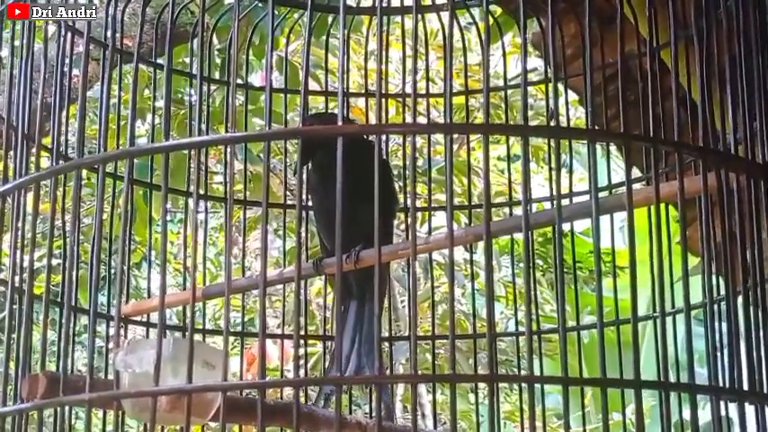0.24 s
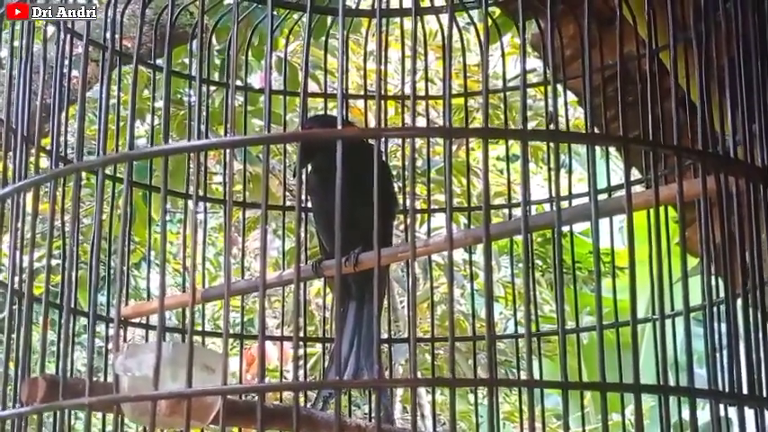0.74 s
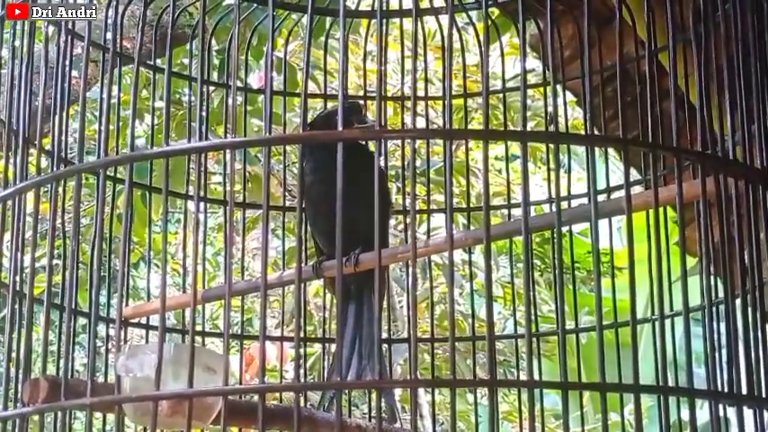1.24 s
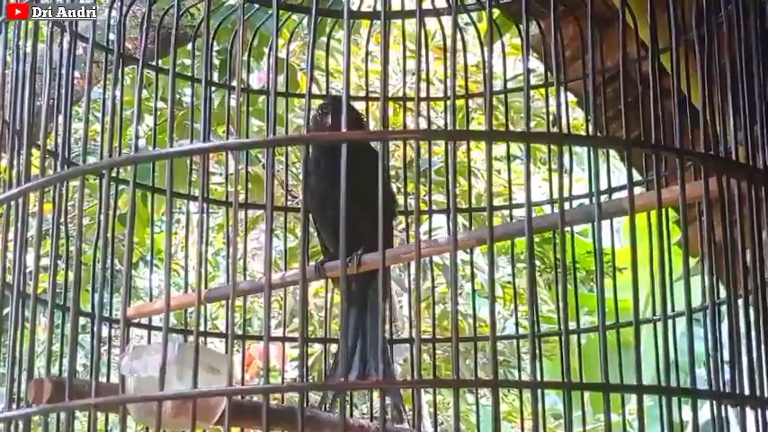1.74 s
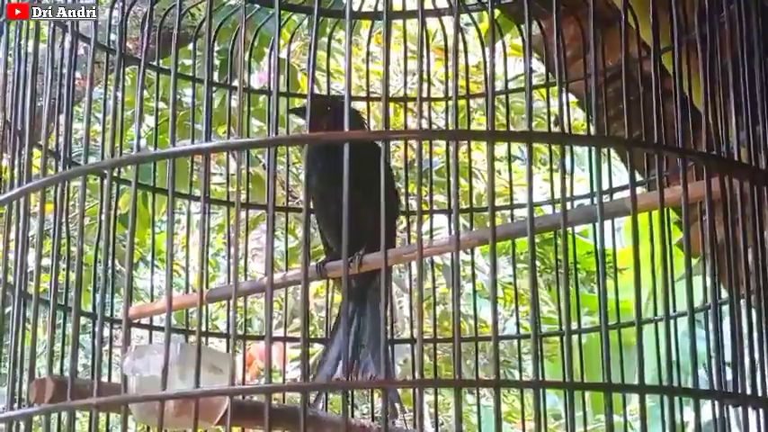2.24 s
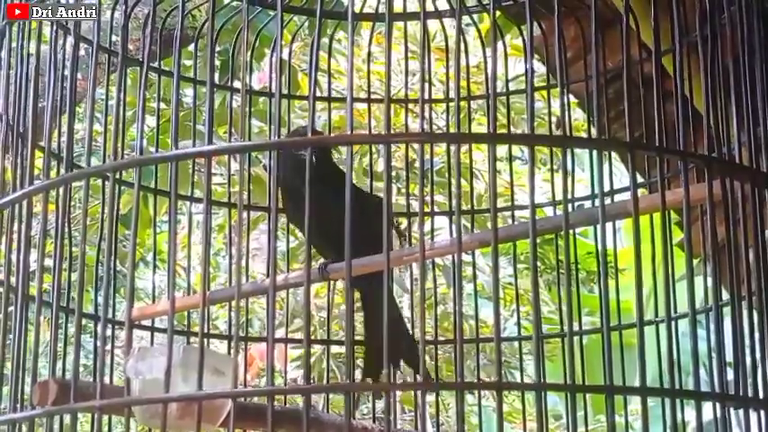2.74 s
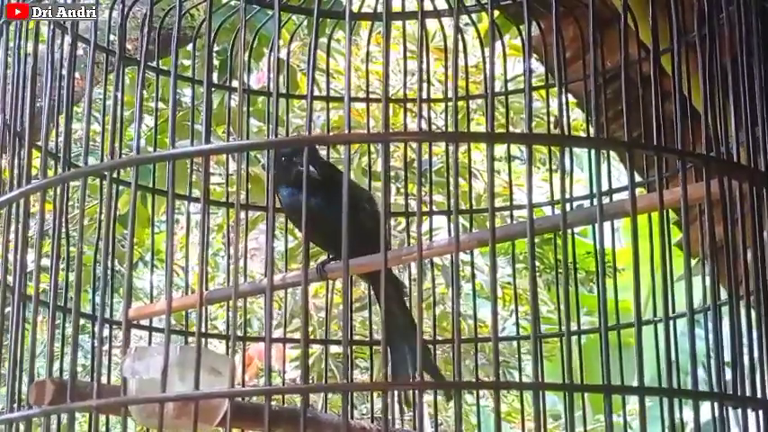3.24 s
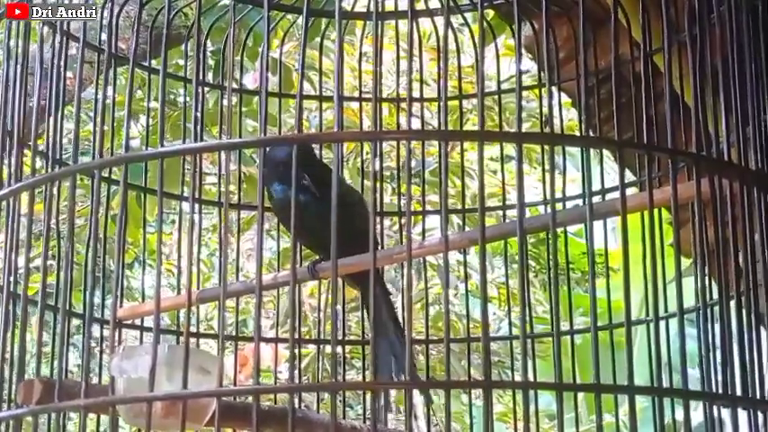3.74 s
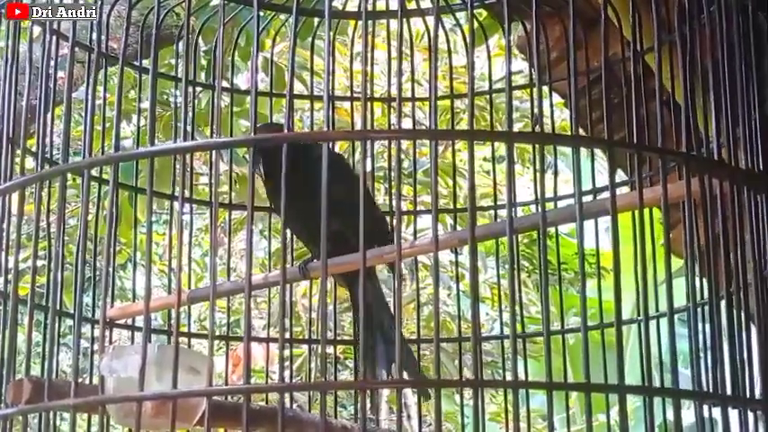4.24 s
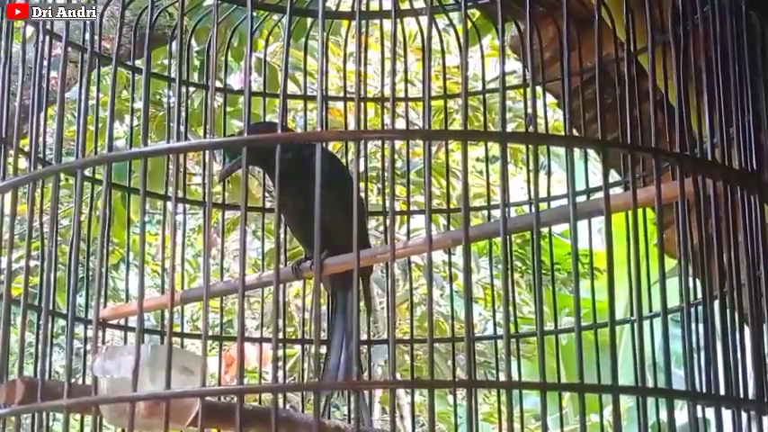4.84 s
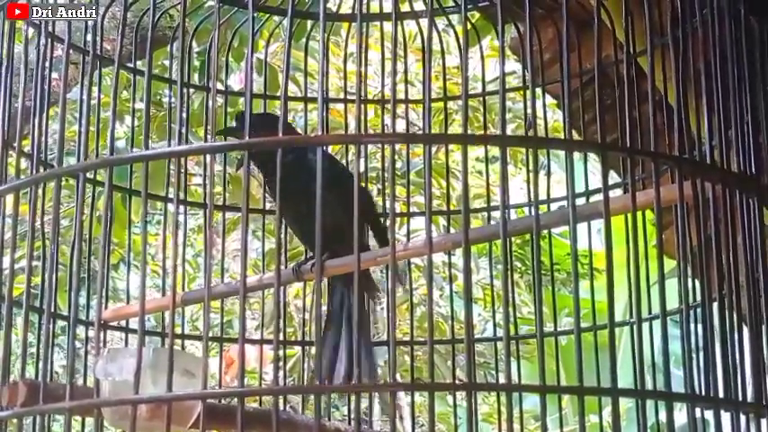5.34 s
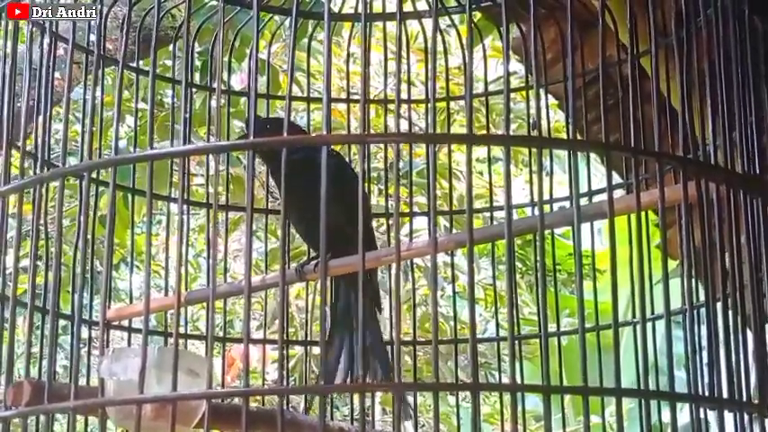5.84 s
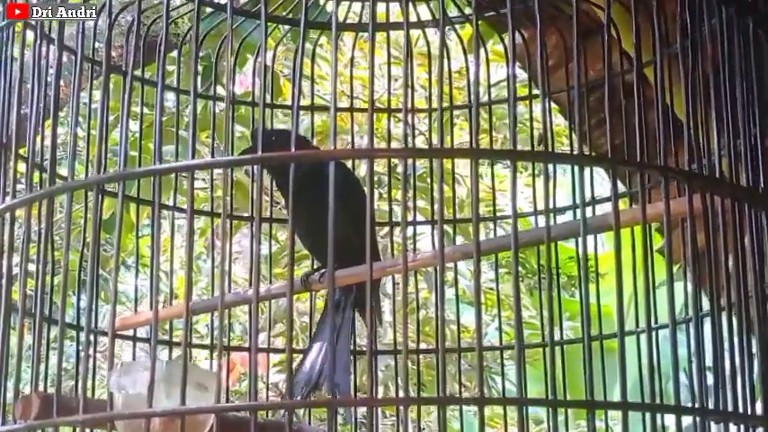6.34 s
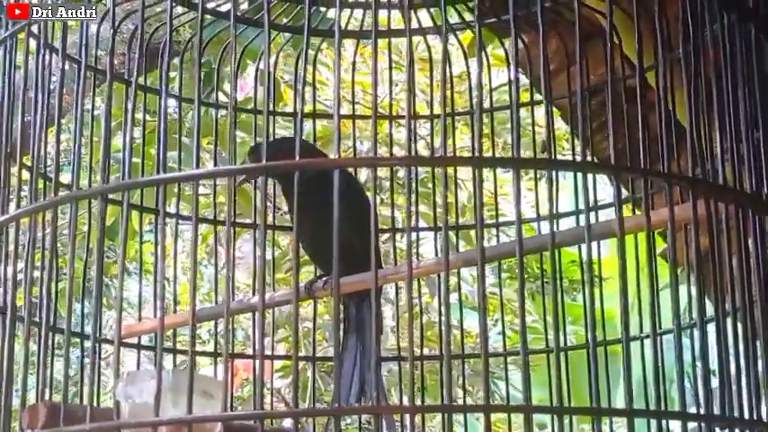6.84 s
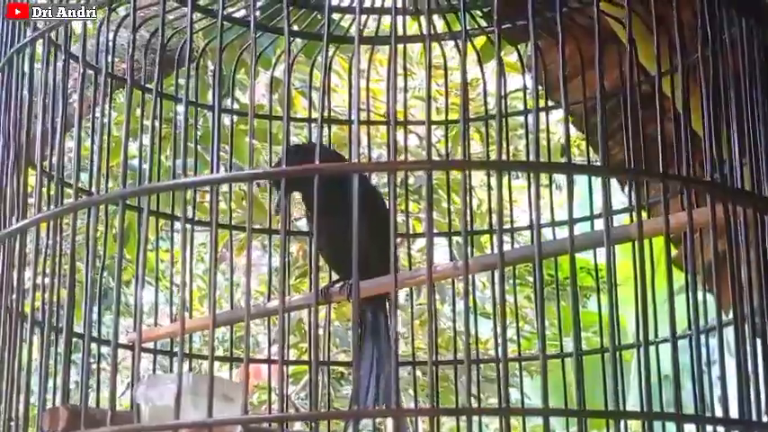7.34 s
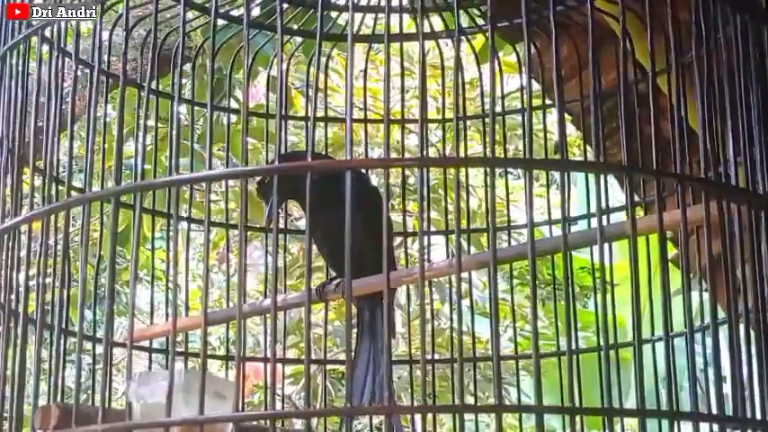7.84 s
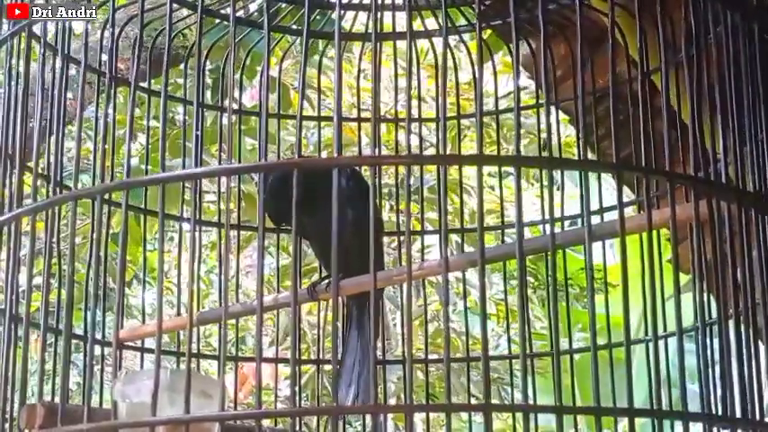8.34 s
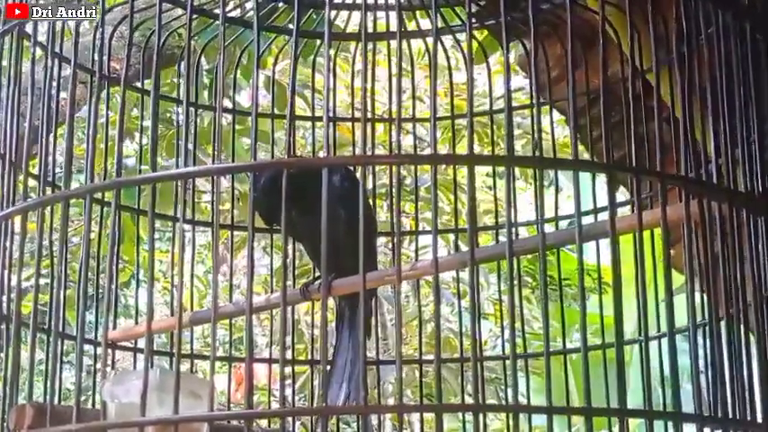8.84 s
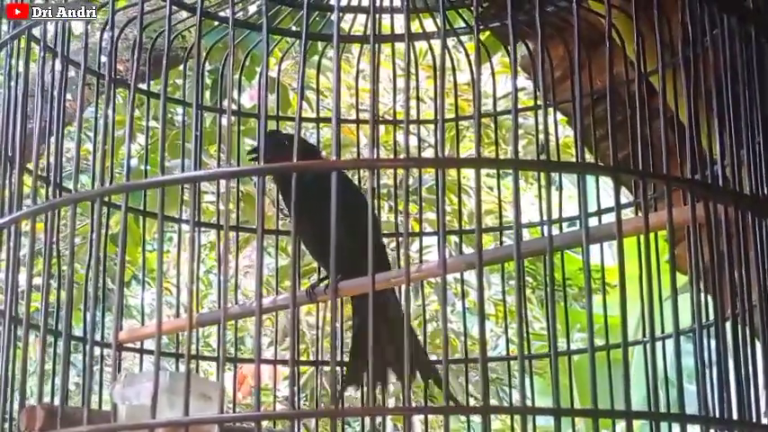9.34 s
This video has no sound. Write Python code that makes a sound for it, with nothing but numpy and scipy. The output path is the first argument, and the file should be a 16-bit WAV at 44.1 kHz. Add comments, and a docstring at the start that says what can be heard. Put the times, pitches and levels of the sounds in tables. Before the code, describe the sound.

Outdoors on a porch, a caged bird close to the microphone sings nearly dry: rounded hoots first, piercing chirps next, then pure held whistles alternating with single chirps. Behind it, a more echoing neighbour whistles low, another bird repeats quick up-down chips, and thin slurs and piping drift from the garden. Soft rumble, dull knocks and light rustles lie underneath; each loud chirp briefly pushes the background down.

```python
"""A garden porch, where a caged drongo hoots, holds long whistles that sag at the end, and snaps out sharp rising chirps.
Farther off a neighbour whistles low, one bird repeats an up-down chip, and others add thin slurs and piping.
Every voice is a gliding sine with weak overtones; the chirps add shaped noise as rasp.
Behind lie a motor's fading hum built from shaft harmonics, and rumble, broadband noise, hiss, knocks and rustles.
Loud chirps push the gain down, and the garden slowly swells back."""
import sys
import numpy as np
from scipy import signal
from scipy.fft import rfft, irfft, next_fast_len
from scipy.io import wavfile
from scipy.ndimage import uniform_filter1d, minimum_filter1d, map_coordinates

SR = 44100
rng = np.random.default_rng(int(sys.argv[2]) if len(sys.argv) > 2 else 0)


def transcribe(signal):
    """Save signal, clipped to [-1, 1], as a 16-bit WAV file at the path in sys.argv[1]."""
    frames = np.atleast_2d(signal).T
    limited = np.clip(frames, -1, 1)
    pcm = np.round(limited * 32767).astype(np.int16)
    wavfile.write(sys.argv[1], SR, pcm)


N = 422478  # length of the scene in samples


def amp(db):
    """Decibels to linear gain."""
    return 10 ** (np.asarray(db) / 20)


def unit(x):
    """x at rms 1."""
    return x / np.sqrt(np.mean(x ** 2) + 1e-20)


def span(length_s):
    """Sample times of a sound of this length."""
    return np.arange(int(length_s * SR)) / SR


def along(points, hz):
    """(Hz, value) points read on a log frequency axis."""
    f, v = np.transpose(points)
    return np.interp(np.log(hz + 1), np.log(f + 1), v)


def curves(rows, size=130):
    """Each column per sample from the first row's time to the last, corners rounded over size samples."""
    s, *cols = np.transpose(rows)
    t = np.arange(s[0], s[-1], 1 / SR)
    return [uniform_filter1d(np.interp(t, s, c), size) for c in cols]


def wobble(rate, n):
    """A smooth random curve of n samples, rate knots a second."""
    knots = rng.standard_normal(int(n * rate / SR) + 4)
    return map_coordinates(knots, [np.arange(n) * rate / SR])


def noise(colour, n):
    """Noise of rms 1 with the given (Hz, dB) spectrum."""
    m = next_fast_len(n + 8192)
    gain = amp(along(colour, np.fft.rfftfreq(m, 1 / SR)))
    return unit(irfft(rfft(rng.standard_normal(m)) * gain, m)[:n])


def patchy(x, depth_db):
    """x at rms 1, with patches of random gain in time and frequency."""
    z = signal.stft(x, nperseg=1024)[2]
    field = uniform_filter1d(rng.standard_normal(z.shape), size=4, axis=0)
    field = uniform_filter1d(field, size=9, axis=1)
    return unit(signal.istft(z * amp(depth_db * unit(field)), nperseg=1024)[1][:len(x)])


def fade(n, edge_s):
    """A gate of n samples that opens and closes softly over edge_s."""
    i = np.arange(n)
    nearest_end = np.minimum(i, i[::-1])
    return np.sin(np.pi / 2 * np.minimum(nearest_end / (edge_s * SR), 1)) ** 2


def add(track, s, x):
    """Mix x into the track at time s."""
    i = min(max(round(s * SR), 0), N)
    track[i:i + len(x)] += x[:N - i]


def syrinx(hz, waver, rate, overtones):
    """A bird's voice: a slightly unsteady sine of rms 1 plus weak (multiple, dB) overtones."""
    phase = 2 * np.pi * np.cumsum(hz * (1 + waver * wobble(rate, len(hz)))) / SR
    upper = sum(amp(db) * np.sin(k * phase) for k, db in overtones)
    return np.sqrt(2) * (np.sin(phase) + upper)


# the drongo's long whistles: (time [s], length [s], pitch [Hz], sag [Hz/s], final fall [s])
LONG_WHISTLES = [(4.418, 1.0274, 1742, 52, 0.14), (8.109, 1.11, 1748, 57.06, .112)]
# loudness of each long whistle, one list per note: (time [s], level before WHISTLE_GAIN_DB [dB])
WHISTLE_LEVELS = [
    [(4.42, -56), (4.448, -25.5), (4.478, -17), (4.53, -31.5), (4.548, -21.5), (4.806, -30), (5.01, -17.5),
     (5.232, -28), (5.306, -12), (5.426, -27), (5.445, -47)],
    [(8.11, -29.5), (8.146, -19.5), (8.368, -27), (8.436, -19.5), (8.452, -28), (8.7, -21), (8.81, -27.5),
     (9.098, -33.5), (9.13, -21.5), (9.194, -25), (9.22, -34.5)],
]
# overtones of every low whistled note: (multiple of the pitch, level [dB])
WHISTLE_OVERTONES = [(2, -50.5), (3, -66)]
WHISTLE_GAIN_DB = 2.5
SCOOP_HZ, SCOOP_S, FALL_HZ = 149, .055, 756  # slide up to pitch, and the fall's depth before rounding


def whistles():
    """Long notes that slide up, sag slowly while held and fall away at the end."""
    out = np.zeros(N)
    for (s, length, top_hz, sag_hz, fall_s), levels in zip(LONG_WHISTLES, WHISTLE_LEVELS):
        t = span(length)
        fall = np.maximum(1 - (length - t) / fall_s, 0)
        fall = uniform_filter1d(fall, size=1800, mode="nearest")
        hz = top_hz - SCOOP_HZ * np.exp(-t / SCOOP_S) - sag_hz * t - FALL_HZ * fall
        db = WHISTLE_GAIN_DB + np.interp(s + t, *np.transpose(levels))
        add(out, s, amp(db) * fade(len(t), .014) * syrinx(hz, .0024, 120, WHISTLE_OVERTONES))
    return out


# the drongo's short hoots:
# (time [s], length [s], pitch [Hz], final drop [Hz], release [s], level [dB])
HOOTS = [(0.828, 0.12, 1658, 60, 0.033, -8.5), (.955, .16, 1680, 100, 0.038, -9),
         (1.091, 0.17, 1680, 100, 0.037, -11), (1.293, 0.21, 1678, 380, 0.12, -10.5)]
HOOT_ATTACK_S, HOOT_SCOOP_HZ, HOOT_SCOOP_S, HOOT_DROP_POWER = .065, 135, .02, 3.3


def hoots():
    """Short, nearly pure notes that arch in pitch and swell softly."""
    out = np.zeros(N)
    for s, length, top_hz, drop_hz, release, db in HOOTS:
        t = span(length)
        scoop = HOOT_SCOOP_HZ * np.exp(-t / HOOT_SCOOP_S)
        hz = top_hz - scoop - drop_hz * (t / length) ** HOOT_DROP_POWER
        opening = np.minimum(np.minimum(t / HOOT_ATTACK_S, (length - t) / release), 1)
        swell = np.sin(np.pi / 2 * opening) ** 2
        add(out, s, amp(db) * swell * syrinx(hz, 0.0053, 120, WHISTLE_OVERTONES))
    return out


# shape of the sharp chirp, before stretch and tuning: (time [s], pitch [Hz], relative level [dB])
CHIRP = [(0, 1174, -46.5), (.008, 1856, -43), (.014, 3195, -4.5), (0.017, 3433, -5), (0.047, 3154, -13),
         (.06, 3140, -12), (.075, 3410, -19.5), (.09, 3850, -11.5), (.11, 4078, -11.5), (.137, 4156, -13.5),
         (.182, 4130, -16)]
# the drongo's sharp chirps:
# (time [s], level [dB], time stretch [x], length [s], pitch factor [x], lift of the top note [dB])
CHIRPS = [(1.582, 17, 1.03, .173, 1.01, 0), (1.959, 18, .88, .144, 1, 1.5), (2.349, 18, .96, .151, .997, 1),
          (5.475, 17, 1, .17, 1, 0), (9.269, 16, 1.01, .174, .998, -2)]
# what the open beak lets out of the overtones: (frequency [Hz], level [dB])
THROAT = [(2500, 15.5), (5000, -5), (6600, -2), (8300, -8.5), (10200, -7), (12400, -17), (13500, -18),
          (15500, -20.5)]
# near reflections of the chirps: (delay [s], level [dB])
WALLS = [(.0034, -19.5), (.0083, -14), (0.012, -22), (0.02, -17)]
SNAP_S, SNAP_STEEPNESS = 0.015, 3.5  # the voice is half clear at this time, before stretch
RASP_DB, OVERTONE_DB = (7, -48.5), (5.5, -28)  # (hoarse, clear), relative to the tone


def chirps():
    """Each chirp snaps upward with a rasp, dips, then rises to a clear top note and stops dead."""
    out = np.zeros(N)
    rasp_colour = [(300, -23.5), (1200, -20), (2800, 11), (4500, 2.5), (6700, -1.5),
                   (8000, -12.5), (10300, -4.5), (12500, -30.5), (15000, -19.0)]
    for s, chirp_db, stretch, length, tune, lift_db in CHIRPS:
        stretched = [(u * stretch, *rest) for u, *rest in CHIRP]
        hz, db = [c[:int(length * SR)] for c in curves(stretched, size=90)]
        t = np.arange(len(hz)) / SR
        clear = 1 - 1 / (1 + (t / (SNAP_S * stretch)) ** SNAP_STEEPNESS)  # 0 hoarse, 1 clear
        rasp = amp(np.interp(clear, [0, 1], RASP_DB))
        bright_db = np.interp(clear, [0, .5], OVERTONE_DB)
        overtones = [(k, bright_db + along(THROAT, k * hz)) for k in range(2, 6)]
        waver = .0015 + .025 * rasp  # the pitch is least steady while the voice rasps
        voice = syrinx(tune * hz, waver, 500, overtones) + rasp * noise(rasp_colour, len(hz))
        level_db = chirp_db + db + lift_db * t / length
        add(out, s, amp(level_db) * fade(len(hz), .005) * voice)
    # reflections from close by beat against the gliding tone
    direct = out.copy()
    for delay, db in WALLS:
        add(out, delay, amp(db) * direct)
    return out + amp(-19) * eaves(out, t60=.1)


# low whistles of a neighbouring bird, loudest at the turn, levels before the mix:
# (time [s], rise [s], tail [s], start [Hz], turn [Hz], end [Hz], level [dB])
NEIGHBOUR_WHISTLES = [(4.489, .19, 0.037, 1370, 2040, 1950, -29.5),
                      (6.6, 0.097, 0.067, 1340, 1601, 1565, -16.5),
                      (6.838, 0.043, 0.11, 1447, 1620, 1815, -17.5),
                      (8.01, .1, 0.09, 1248, 1512, 1506, -20), (8.151, .08, 0.13, 1500, 1655, 1614, -18),
                      (8.358, .05, 0.074, 1520, 1668, 1807, -16.5),
                      (9.032, .11, 0.1, 1250, 1489, 1440, -20.5),
                      (9.432, 0.068, 0.073, 1850, 1713, 1036, -17.5)]
NEIGHBOUR_RISE_DB, NEIGHBOUR_FADE_DB = 27.5, 16.5


def neighbour_whistles():
    """Each low whistle swells while it glides to a turn, then dies away."""
    out = np.zeros(N)
    for s, rise, tail, start_hz, turn_hz, end_hz, peak_db in NEIGHBOUR_WHISTLES:
        shape = [(0, start_hz, -NEIGHBOUR_RISE_DB),
                 (rise, turn_hz, 0),
                 (rise + tail, end_hz, -NEIGHBOUR_FADE_DB)]
        hz, db = curves(shape, size=500)
        voice = syrinx(hz, 0.0092, 120, WHISTLE_OVERTONES)
        add(out, s, amp(peak_db + db) * fade(len(hz), 0.012) * voice)
    return out


# shape of the repeated chip: (time [s], pitch [Hz], relative level [dB])
CHIP = [(0, 3680, -16.5), (.01, 4420, 1.5), (.02, 5310, -0.5), (.038, 5640, -8.5), (.047, 4495, -12.5),
        (.056, 3710, -2), (.07, 2750, 2.5), (.084, 1980, -2.5), (.096, 1600, -17)]
# repeated chips, levels before the mix: (time [s], level [dB])
CHIPS = [(.062, -37.5), (.295, -35), (.539, -36.5), (.785, -36.5), (4.047, -43), (4.307, -36),
         (4.553, -35.5), (4.809, -33), (5.045, -34.5), (5.306, -35), (5.553, -38), (5.813, -33),
         (6.054, -35.5), (6.325, -35), (6.585, -34.5), (6.873, -34.5), (7.125, -34.5), (7.371, -36)]


def chips():
    """Runs of one up-down syllable, about four a second."""
    out = np.zeros(N)
    hz, db = curves(CHIP)
    for s, chip_db in CHIPS:
        voice = syrinx(hz, .013, 400, [(2, -46)])
        add(out, s, amp(chip_db + db) * fade(len(hz), .003) * voice)
    return out


# thin slurs that glide to a knee and then plunge, levels before the mix:
# (time [s], glide [s], start [Hz], knee [Hz], level [dB])
SLURS = [(0, 0.098, 5140, 4194, -36.5), (.16, 0.046, 3870, 3427, -35.5), (.26, .125, 5390, 4370, -36.5),
         (.388, 0.0052, 3850, 3564, -24.5), (.55, .12, 4296, 3784, -38.5), (.99, 0.072, 4970, 4840, -45.5),
         (1.31, .06, 5130, 4444, -43), (1.43, 0.085, 4505, 4145, -42), (2.58, .19, 5400, 4170, -34),
         (2.93, 0.074, 5483, 5080, -34), (3.02, 0.04, 4460, 3700, -28.5), (3.15, 0.15, 4730, 4055, -44.5),
         (3.43, 0.058, 5180, 5070, -49), (3.63, 0.16, 5420, 4775, -41.5), (3.76, 0.17, 5000, 4643, -41.5),
         (4.33, .1, 5340, 4790, -41.5), (4.42, 0.18, 5070, 4576, -40), (4.69, 0.14, 5654, 5106, -38),
         (4.83, .085, 5000, 3500, -35), (5.92, 0.11, 4735, 4280, -34.5), (6.42, 0.12, 4100, 4410, -40),
         (6.74, 0.16, 5210, 4373, -40.5), (7.03, 0.2, 3350, 3430, -39), (7.89, 0.25, 3746, 3585, -44),
         (8.18, 0.25, 4126, 4710, -42), (8.429, 0.097, 4490, 4110, -41)]
PLUNGE_S, PLUNGE_SHARE = 0.042, 0.31  # every slur ends by losing this share of its pitch
SLUR_SCOOP_SHARE, SLUR_SCOOP_S = .07, .013
SLUR_SWELL_DB, FAINT_SLUR_DB = 2.5, -54


def slurs():
    """Soft twittering: each note scoops up, glides and plunges; fainter ones come at random."""
    out = np.zeros(N)
    faint = [(when * N / SR, .03 + .1 * slow, 3700 + 1600 * high, 3300 + 1500 * high, FAINT_SLUR_DB)
             for when, slow, high in rng.random((24, 3))]
    for s, glide, start_hz, knee_hz, db in list(SLURS) + faint:
        t = span(glide + PLUNGE_S)
        progress = np.minimum(t / glide, 1)
        plunge = np.maximum((t - glide) / PLUNGE_S, 0)
        scoop = SLUR_SCOOP_SHARE * np.exp(-t / SLUR_SCOOP_S)
        bend = 1 - scoop - PLUNGE_SHARE * plunge ** 1.2 + 0.011 * wobble(28, len(t))
        hz = (start_hz + (knee_hz - start_hz) * progress) * bend
        swell_db = db - SLUR_SWELL_DB * (1 - progress) + 2.2 * wobble(61, len(t))
        add(out, s, amp(swell_db) * fade(len(t), .012) * syrinx(hz, 0.009, 160, [(2, -38)]))
    return out


# far piping, levels before the mix: (time [s], length [s], start [Hz], end [Hz], level [dB])
PIPES = [(0, 0.12, 3550, 3770, -43), (0.204, 0.2, 2550, 2753, -44), (.45, 0.16, 2658, 2918, -37.5),
         (0.734, 0.079, 2360, 2447, -36.5), (0.972, 0.29, 2574, 3008, -38), (1.333, .12, 4146, 4330, -37.5),
         (1.37, .17, 3420, 3500, -47.5), (1.447, 0.16, 2567, 2622, -42), (3.348, .31, 2393, 2407, -37),
         (3.735, .21, 2070, 1950, -33), (3.764, 0.13, 3170, 2844, -36.5), (3.855, .17, 3430, 3260, -38),
         (4.019, 0.2, 3016, 2650, -31.5), (4.348, 0.17, 2550, 2717, -39.5), (6.21, .13, 3340, 2930, -34),
         (8.35, 0.81, 3505, 3527, -53)]


def pipes():
    """Thin far notes that swell and fade on a straight, gently tilted pitch."""
    out = np.zeros(N)
    for s, length, start_hz, end_hz, db in PIPES:
        hz = np.linspace(start_hz, end_hz, int(length * SR))
        level_db = db + 3.5 * wobble(30, len(hz))
        voice = syrinx(hz, 0.0083, 90, [(2, -37.5)])
        add(out, s, amp(level_db) * fade(len(hz), 0.036) * voice)
    return out


# far knocks: (time [s], level [dB])
KNOCKS = [(2.485, -31), (2.691, -32), (2.93, -29.5), (3.291, -27.5), (3.714, -32), (3.972, -29),
          (4.219, -28), (4.51, -29)]
# spectrum of a knock: (frequency [Hz], relative level [dB per Hz])
KNOCK_BODY = [(120, -82), (270, -8.5), (385, 15), (450, -1), (530, 6), (610, 0), (760, 5), (1100, -5),
              (1700, -16.5), (2600, -31.5), (6000, -96)]
# dry ticks at the cage: (time [s], level [dB])
TICKS = [(.237, -33), (0.298, -39.5)]


def knocks():
    """Dull far blows and two dry ticks close by, all bursts of noise that decay quickly."""
    out = np.zeros(N)
    t = np.arange(SR // 3) / SR
    tick_colour = [(800, -28.0), (2500, -5), (5500, 3.0), (9000, -18.5), (15000, -13.0)]
    for s, db in KNOCKS:
        onset = 1 - np.exp(-t / .005)
        add(out, s, amp(db - 60 * t / .3) * onset * noise(KNOCK_BODY, len(t)))
    for s, db in TICKS:
        add(out, s, amp(db - 60 * t / 0.016) * noise(tick_colour, len(t)))
    return out


# soft high rustles: (time [s], length [s], level [dB])
RUSTLES = [(7.567, 0.34, -56), (8.946, 0.17, -64.5), (9.244, 0.03, -39)]


def rustles():
    """Brief swishes of noise that rise quickly and die away."""
    out = np.zeros(N)
    colour = [(1000, -24), (2500, -10), (4200, 3.0), (5900, 0), (7400, -15.5), (10000, -16), (15000, -60.0)]
    for s, length, db in RUSTLES:
        u = np.linspace(0, 1, int(length * SR))
        swish = np.abs(np.sin(np.pi * np.sqrt(u)))
        level_db = db + 2.3 * wobble(63, len(u))
        add(out, s, amp(level_db) * swish * noise(colour, len(u)))
    return out


# the motor's harmonics: (multiple of the shaft rate, relative level [dB])
HUM_ORDERS = [(2, 4.5), (3, -7), (4, -22)]
HUM_DB, HUM_FADE_START_S, HUM_FADE_DB_PER_S = -41, 2.2, 14


def motor_hum(t):
    """Harmonics of a slightly unsteady shaft, holding their level and then fading away."""
    shaft_hz = 84.9
    phase = 2 * np.pi * np.cumsum(shaft_hz * (1 + .014 * wobble(14, N))) / SR
    tone = unit(sum(amp(db) * np.sin(k * phase) for k, db in HUM_ORDERS))
    fade_db = HUM_FADE_DB_PER_S * np.maximum(t - HUM_FADE_START_S, 0)
    return amp(HUM_DB - fade_db + 1.1 * wobble(21, N)) * tone


# spectra of distant rumble, broadband noise and hiss: (frequency [Hz], relative level [dB per Hz])
RUMBLE_COLOUR = [(15, -58.5), (25, -25.5), (75, -3.5), (118, 6.5), (216, -1), (257, -2.5), (335, -16.5),
                 (430, -22), (500, -23.5), (650, -39), (1100, -120)]
BROADBAND_COLOUR = [(150, -4.5), (330, 5.5), (500, 5), (800, 4.5), (1500, 1), (3000, -4), (4200, -15.5),
                    (8000, -46)]
HISS_COLOUR = [(1000, -33.5), (3000, -0.5), (5000, -1.5), (6500, 2.5), (7600, -15), (11000, -18),
               (15500, -20.5)]
# brief rises of the broadband background noise: (time [s], half width [s], rise [dB])
NOISE_RISES = [(5.15, 0.28, 7.5), (8.88, .22, 8)]
RUMBLE_DB, BROADBAND_DB, HISS_DB = -44.5, -57, -67  # broadband level is without its rises
LULL_S, LULL_WIDTH_S, LULL_DB = 3.8, 1.1, -7  # the rumble eases around this time


def background():
    """The hum over three patchy noises: distant rumble, broadband noise that briefly rises, and hiss."""
    t = np.arange(N) / SR
    lull_db = LULL_DB * np.exp(-((t - LULL_S) / LULL_WIDTH_S) ** 2)
    rise_db = sum(db * np.exp(-((t - s) / width) ** 2) for s, width, db in NOISE_RISES)
    rumble = amp(RUMBLE_DB + lull_db) * patchy(noise(RUMBLE_COLOUR, N), depth_db=4.5)
    broadband = amp(BROADBAND_DB + rise_db) * patchy(noise(BROADBAND_COLOUR, N), depth_db=4.5)
    hiss = amp(HISS_DB) * patchy(noise(HISS_COLOUR, N), depth_db=5.0)
    return motor_hum(t) + rumble + broadband + hiss


def eaves(x, t60):
    """The quick, dense answer of the roof: decaying noise that starts after 4 ms."""
    t = np.arange(SR // 5) / SR
    tail = rng.standard_normal(len(t)) * amp(-60 * t / t60) * (t > .004)
    return signal.fftconvolve(x, tail / np.linalg.norm(tail))[:N]


# decay of porch and garden: (frequency [Hz], time to fall 60 dB [s])
PORCH = [(200, .4), (1500, 0.22), (4000, 0.49), (8000, 0.11), (14000, 0.26)]


def echo(x):
    """The diffuse answer of porch and garden; each frequency dies at its own speed."""
    hz, t, z = signal.stft(rng.standard_normal(SR), SR, nperseg=256)
    decay = amp(-60 * t / along(PORCH, hz)[:, None])
    tail = signal.istft(z * decay, SR, nperseg=256)[1]
    return signal.fftconvolve(x, tail / np.linalg.norm(tail))[:N]


def scene():
    """The drongo is nearly dry; the neighbour and the chips carry most echo, the twitter more roof."""
    held, sharp = hoots() + whistles(), chirps()
    neighbour, chatter, twitter = neighbour_whistles(), chips(), slurs() + pipes()
    twitter = twitter + amp(-5) * eaves(twitter, t60=.13)
    wet = amp(-13.5) * held + amp(-22.0) * sharp
    wet += amp(-1.0) * neighbour + chatter + amp(-15) * twitter
    direct = held + sharp
    direct += amp(-3.5) * neighbour + amp(0.5) * chatter + amp(-4.0) * twitter
    return (direct + echo(wet) + knocks() + rustles() + background())[None]


CEILING, RECOVERY_S = .73, 1.78  # peak that starts the ducking, and its decay time constant
BASS_DUCK, BASS_HZ = 1.326, 1330  # sound below this sinks this many times as far in dB
TOP_HZ = 15750  # band limit


def record(dry):
    """Gain control ducks at once under a loud peak, the bass most, and recovers slowly; then the band limit."""
    peaks = -minimum_filter1d(-np.abs(dry), size=130)
    excess_db = 20 * np.log10(np.maximum(peaks / CEILING, 1))
    # running maximum under an exponential decay: instant duck, slow return
    recovery = np.exp(-np.arange(N) / SR / RECOVERY_S)
    duck_db = np.maximum.accumulate(excess_db / recovery, axis=-1) * recovery
    duck_db = uniform_filter1d(duck_db, size=130)
    m = next_fast_len(N + 8192)
    hz = np.fft.rfftfreq(m, 1 / SR)
    bass = irfft(rfft(dry, m) / (1 + (hz / BASS_HZ) ** 6), m)[..., :N]
    ducked = (dry - bass) * amp(-duck_db) + bass * amp(-BASS_DUCK * duck_db)
    return irfft(rfft(ducked, m) * (hz < TOP_HZ), m)[..., :N]


dry = scene()
out = record(dry)
transcribe(out)
```